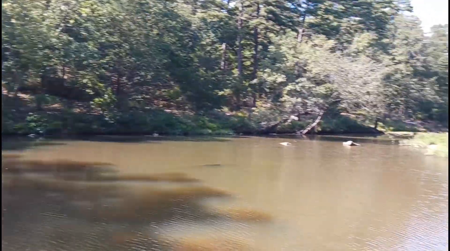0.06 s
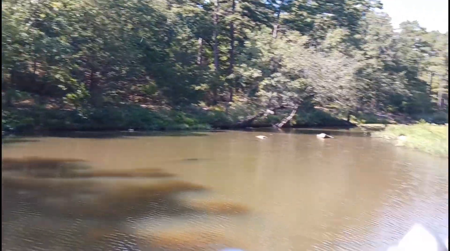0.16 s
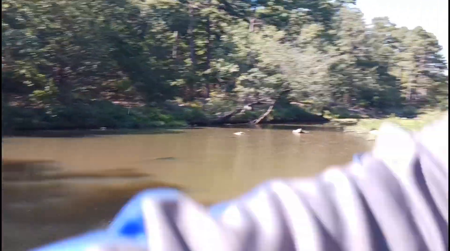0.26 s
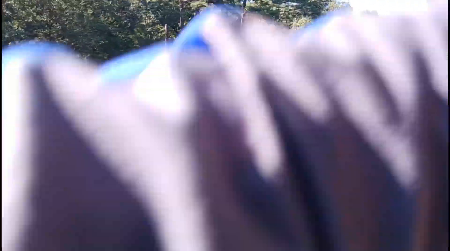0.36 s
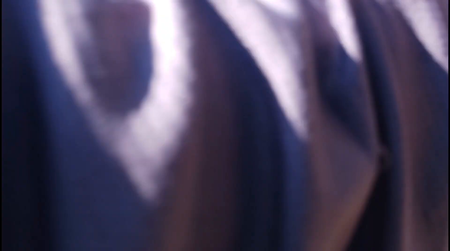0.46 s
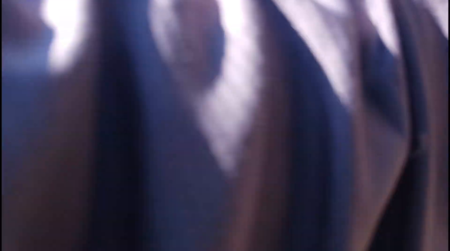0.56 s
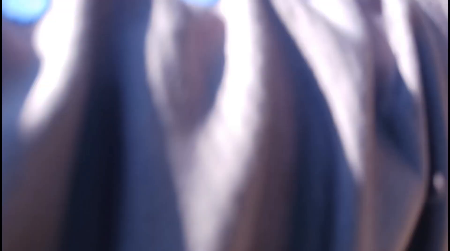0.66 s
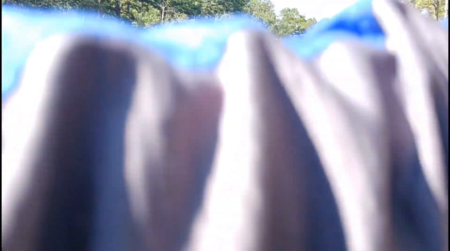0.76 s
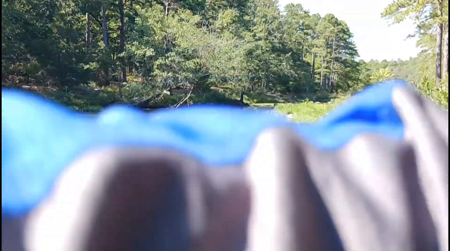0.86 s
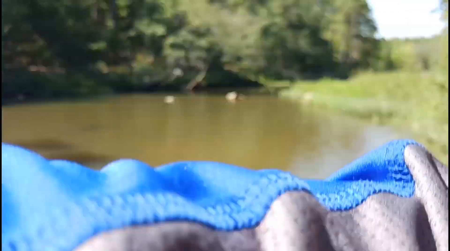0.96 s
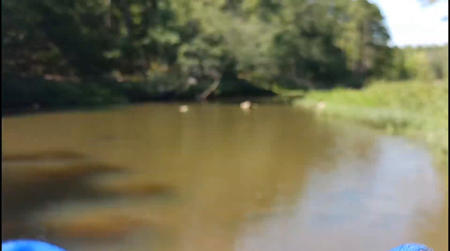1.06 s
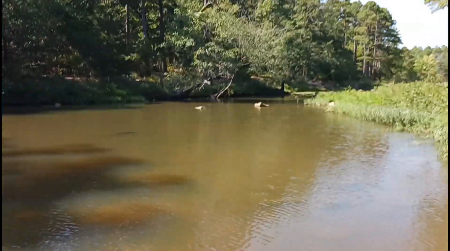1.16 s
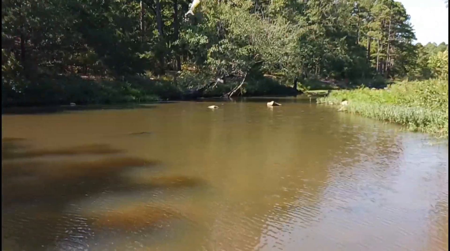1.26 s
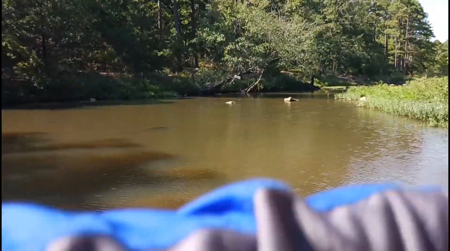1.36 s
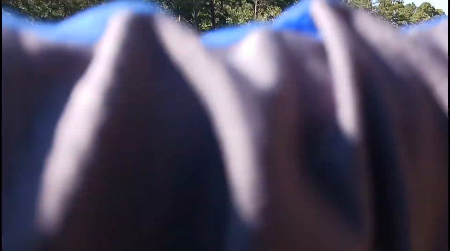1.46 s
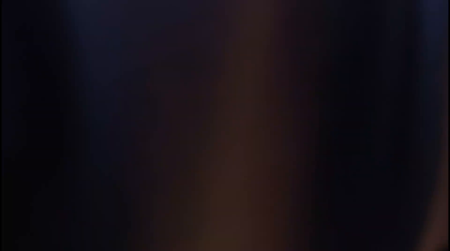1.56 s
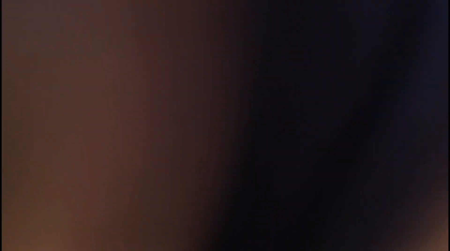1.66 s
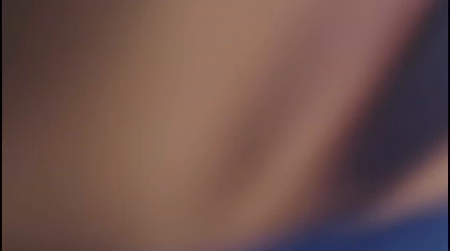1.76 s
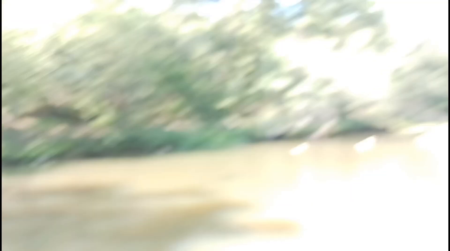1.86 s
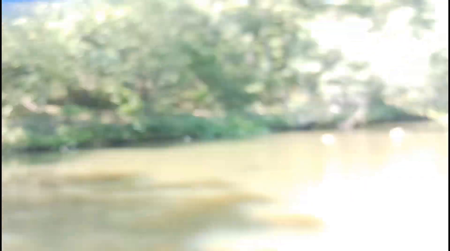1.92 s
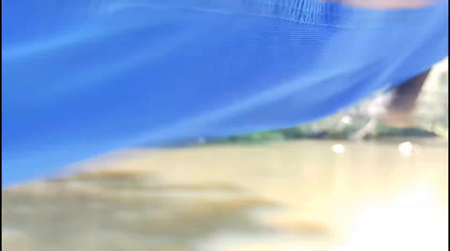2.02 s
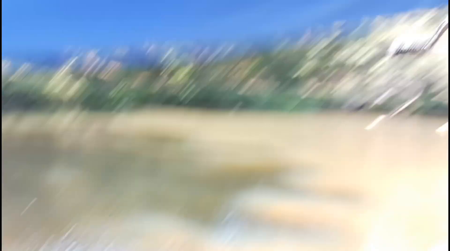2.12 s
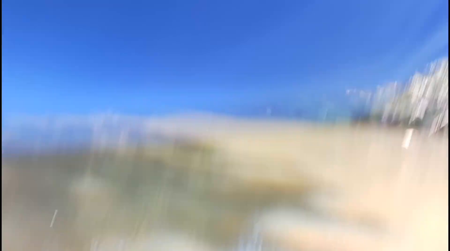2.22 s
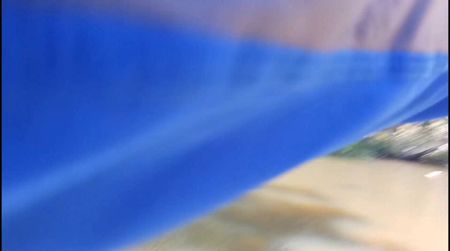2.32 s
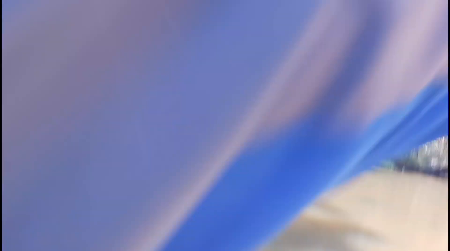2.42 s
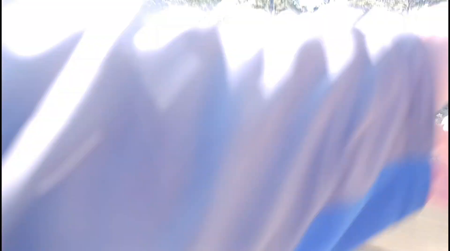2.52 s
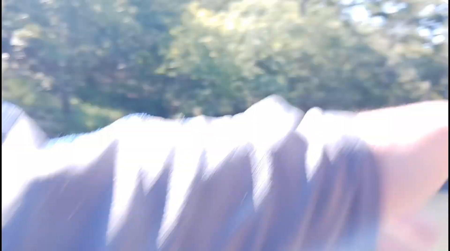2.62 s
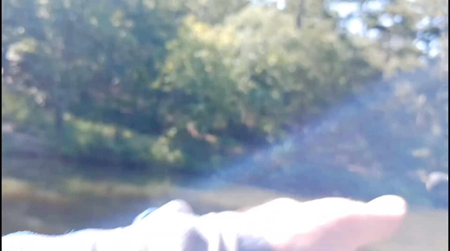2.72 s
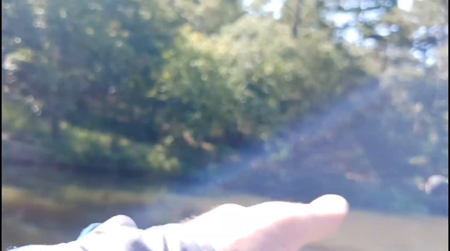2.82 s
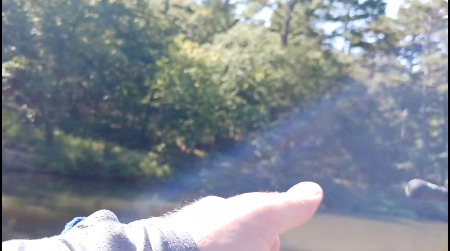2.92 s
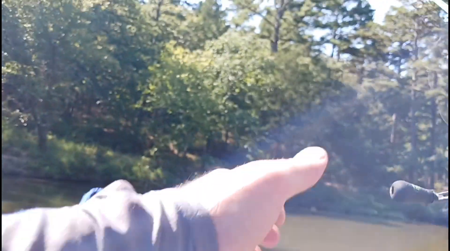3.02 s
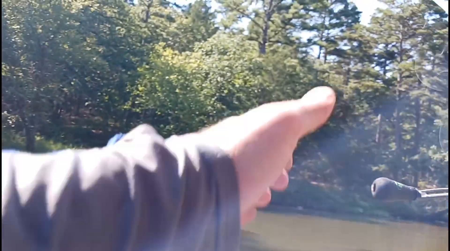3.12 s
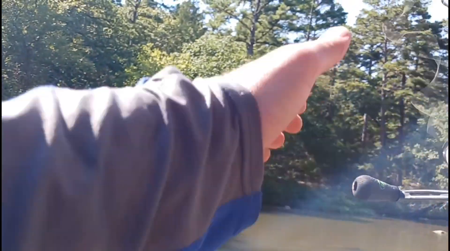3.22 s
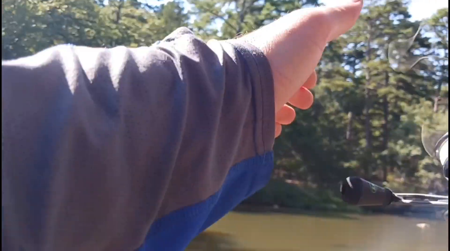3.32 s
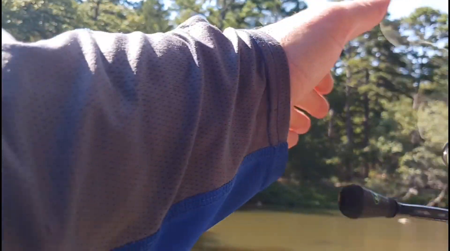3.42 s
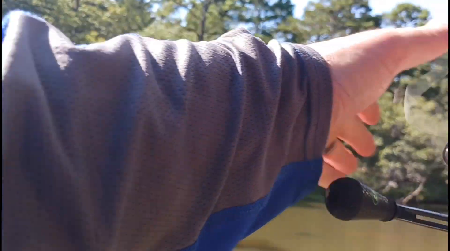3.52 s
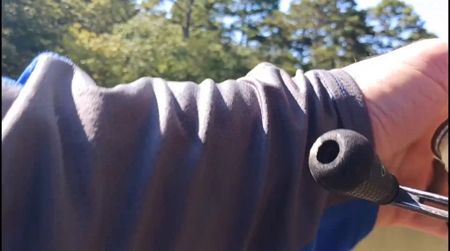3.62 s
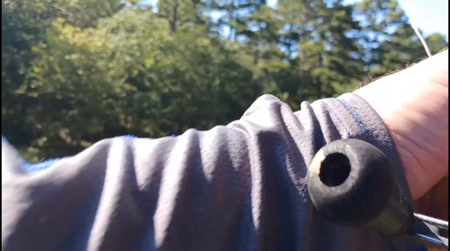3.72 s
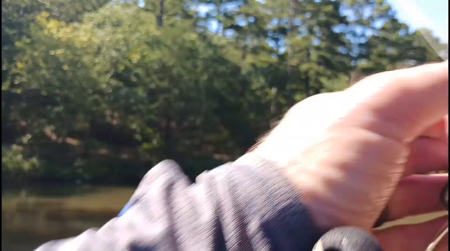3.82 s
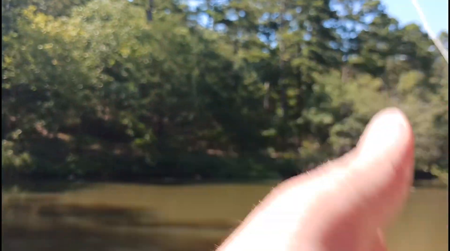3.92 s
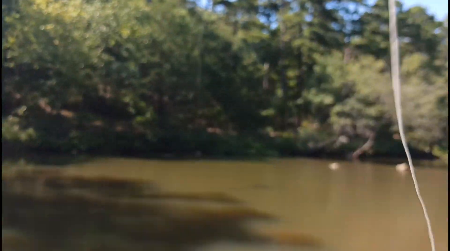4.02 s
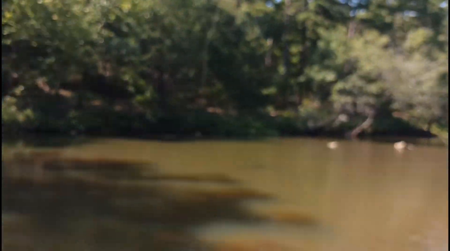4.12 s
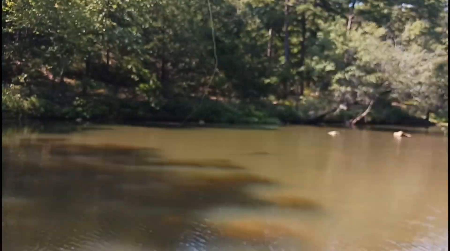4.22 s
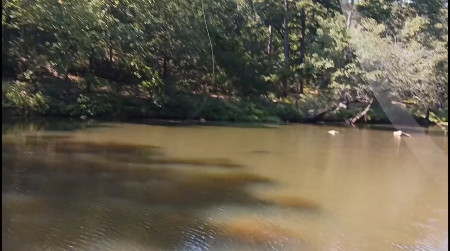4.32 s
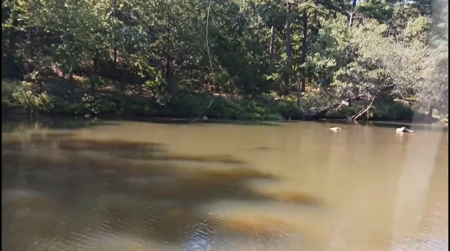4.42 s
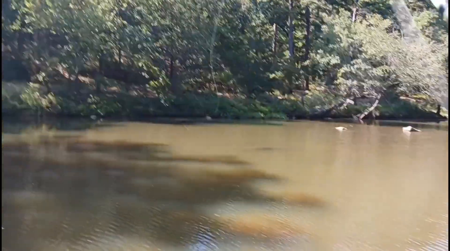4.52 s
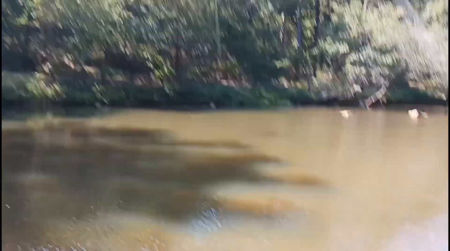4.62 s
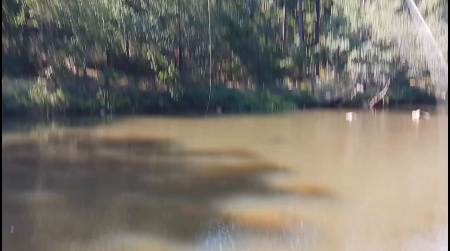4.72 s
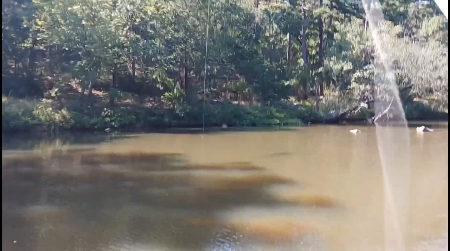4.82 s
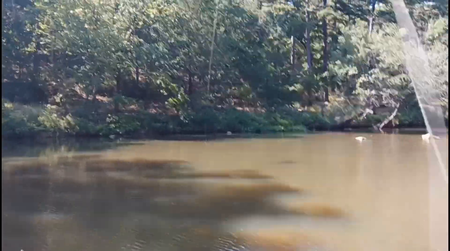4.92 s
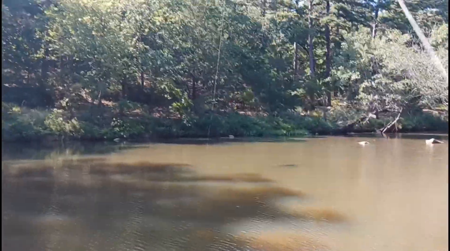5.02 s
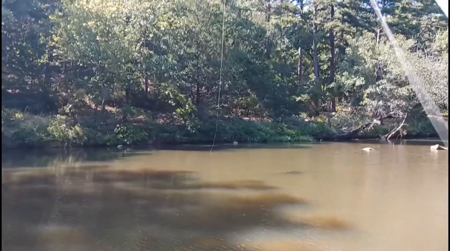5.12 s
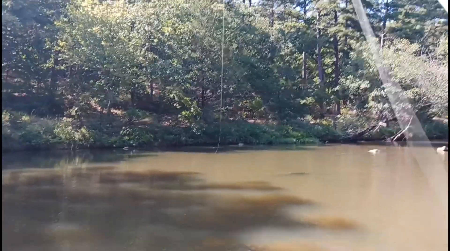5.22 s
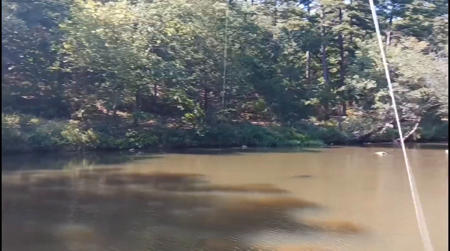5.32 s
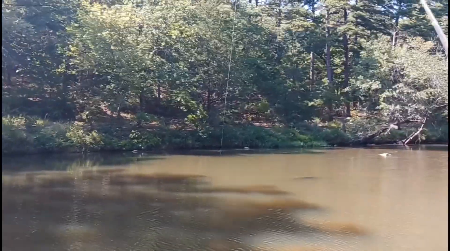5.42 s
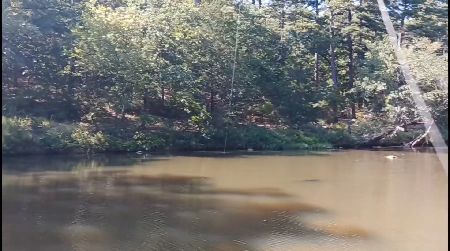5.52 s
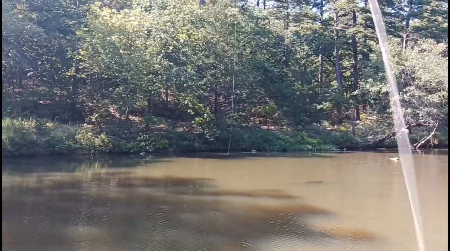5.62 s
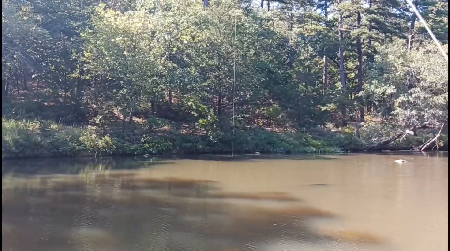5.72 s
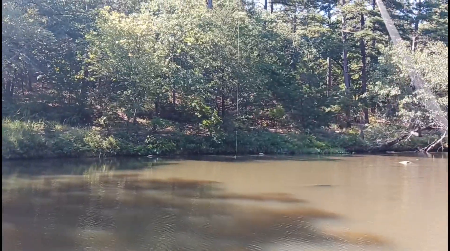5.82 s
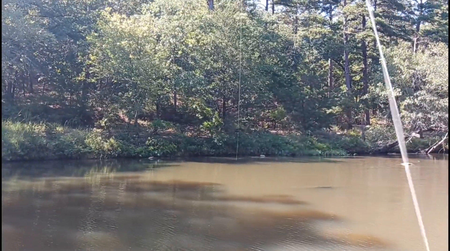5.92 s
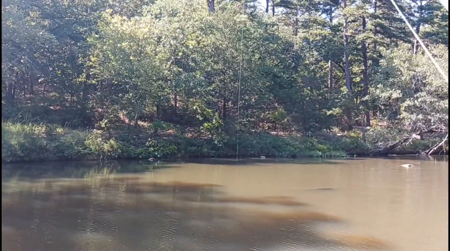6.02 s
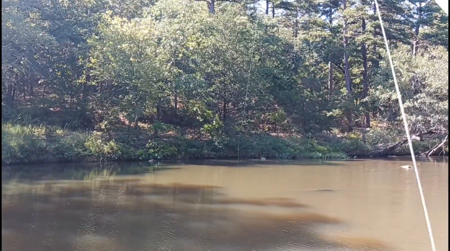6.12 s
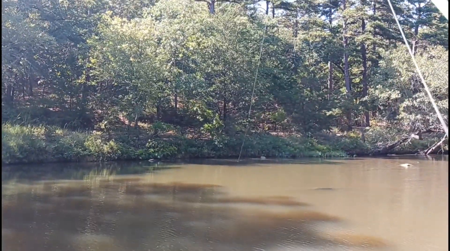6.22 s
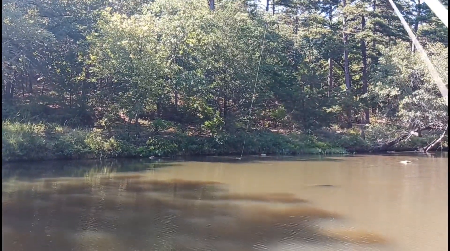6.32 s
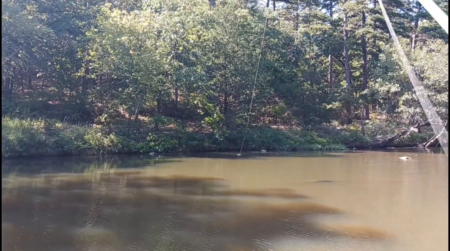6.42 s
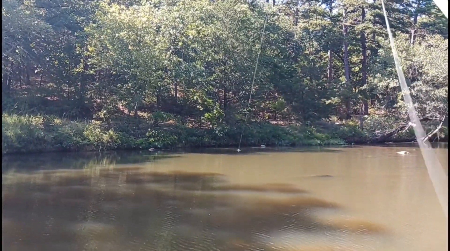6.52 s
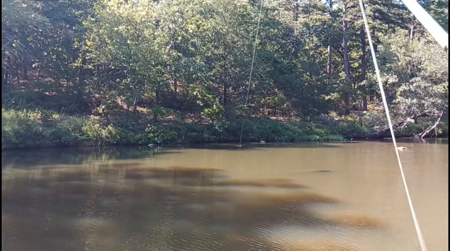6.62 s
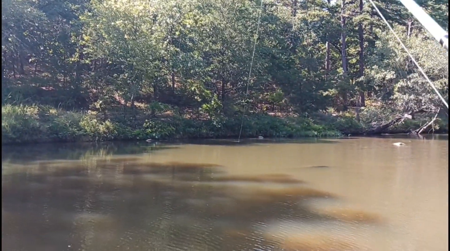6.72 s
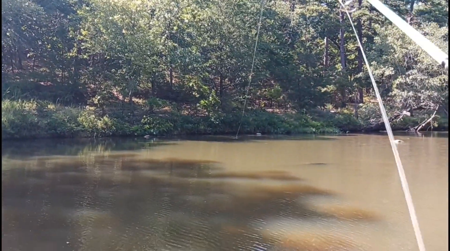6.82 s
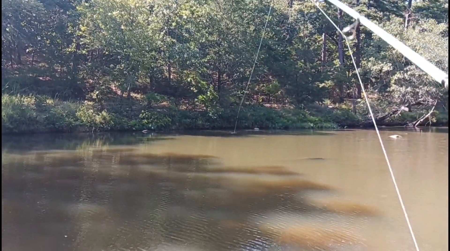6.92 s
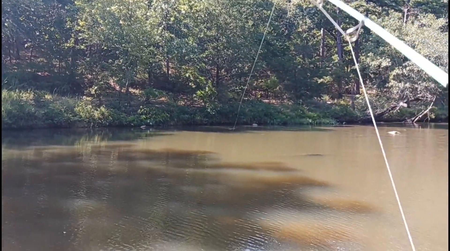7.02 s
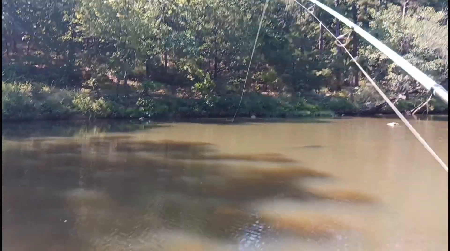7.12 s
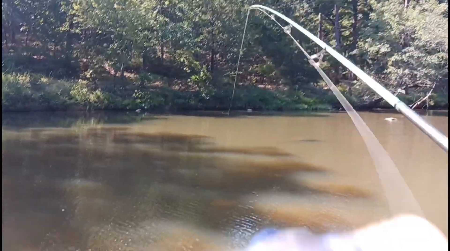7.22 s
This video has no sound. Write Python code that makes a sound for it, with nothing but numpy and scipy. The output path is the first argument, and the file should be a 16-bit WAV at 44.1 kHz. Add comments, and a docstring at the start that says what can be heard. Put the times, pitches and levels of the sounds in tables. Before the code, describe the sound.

Close beside a quiet creek, a fishing reel's bail clacks, cloth thumps the microphone, line hisses out, then the crank whirrs and ticks.

```python
"""A sleeve rustles over the hush of a creek and a spinning reel's bail clacks open, heard at the angler's chest.
Cloth drags over the left microphone port, then loose coils slap the rod and line hisses out with the lure's speed.
The bail snaps shut and the crank winds in, whirring and ticking; light air puffs mostly on the left port.
Friction is grainy filtered noise, contacts are short noise bursts, and hollow parts ring as damped sines.
Gear teeth are harmonics of an uneven tooth rate, passed through the resonances of the reel body."""
import sys
import numpy as np
from scipy import signal
from scipy.fft import rfft, irfft, next_fast_len
from scipy.io import wavfile
from scipy.ndimage import uniform_filter1d, map_coordinates

SR = 44100
rng = np.random.default_rng(int(sys.argv[2]) if len(sys.argv) > 2 else 0)


def output_pcm(signal):
    """Save a mono or channel-first signal as 16-bit PCM at the path in sys.argv[1].

    Samples are clipped to [-1, 1] before scaling.
    """
    pcm = np.clip(np.atleast_2d(signal).T, -1, 1) * 32767
    wavfile.write(sys.argv[1], SR, np.round(pcm).astype(np.int16))


N = 320323
TIME = np.arange(N) / SR

# Levels are relative, since later gains trim the layers; rise and fall are times for 20 dB.
# Faint hush of the creek bank. Each row: frequency in Hz, gain in dB.
CREEK_SPECTRUM = [(15, -32.5), (25, -3), (79, 0.5), (183, -13.5), (666, -15), (871, -24), (1620, -24.5),
                  (3260, -42), (4380, -23.5), (8130, -19.5), (9300, -22.5), (12500, -25.5), (15500, -18)]
# Low pressure noise of moving air on a port. Each row: frequency in Hz, gain in dB.
PUFF_SPECTRUM = [(22, -28.5), (42, -3.5), (58, 5), (85, -3.5), (130, -17), (250, -31.5), (700, -51.5),
                 (2000, -73.5)]
# Puffs of air. Each row: start of the hold in seconds, level in dB.
AIR_PUFFS = [(2.25, -42), (2.36, -43), (2.5, -40.5), (3.1, -42.5), (3.159, -45.5), (3.305, -49.5),
             (3.566, -47.5), (3.655, -41), (3.715, -42), (4.15, -40.5), (4.475, -47), (4.6, -52.5),
             (4.81, -48.5)]
# Envelope shared by the puffs. One row: rise, hold and fall in seconds.
PUFF_ENVELOPE = (0.045, 0.01, 0.059)
DRAUGHT_FROM_S, DRAUGHT_FOR_S, DRAUGHT_DB = 2.2, 2.615, -63.5  # weaker air between the puffs

# Arm movements that rustle the sleeve.
# Each row: start of the hold, rise, hold and fall in seconds, rub level in dB, fizz level in dB.
SLEEVE_MOVES = [(.03, 0.063, 0.47, .3, -68.5, -71.5), (.848, 0.072, 0.026, .06, -55.5, -60),
                (1.04, 0.25, 0.092, 0.36, -68, -66), (1.92, .15, 0.23, .1, -64.5, -66),
                (4.1, 0.32, 0.12, .1, -63.5, -67), (4.29, .1, 0.059, 0.13, -55.5, -58.5),
                (4.58, 0.066, 0.011, 0.12, -64.5, -52.5)]
# Folds of cloth dragged over the port.
# Each row: start of the hold, rise, hold and fall in seconds, buffeting level in dB, scraping level in dB.
CLOTH_DRAGS = [(1.707, .015, 0.07, 0.025, -28, -35.5), (1.825, 0.046, 0.036, .02, -36, -52.5),
               (1.866, 0.031, 0.004, 0.033, -32, -32.5)]
# Cloth rubbing on cloth. Each row: frequency in Hz, gain in dB.
RUB_SPECTRUM = [(200, -4.5), (900, -6), (1700, -1.5), (2700, -2), (3700, 4), (6500, 0.5), (9000, -0.5),
                (14000, -23)]
# High fizz of cloth fibres. Each row: frequency in Hz, gain in dB.
FIZZ_SPECTRUM = [(4000, -11.5), (7500, -7), (10300, -9.5), (11800, 1.5), (13000, 1), (15500, -4)]
# Pressure swings of cloth on the port. Each row: frequency in Hz, gain in dB.
BUFFET_SPECTRUM = [(28, -34), (52, -3.5), (90, 0), (190, -3.5), (290, -3), (480, -6.5), (750, -17),
                   (1500, -30.5), (3000, -61)]
# Cloth scraping the port. Each row: frequency in Hz, gain in dB.
SCRAPE_SPECTRUM = [(150, -9.5), (450, 8.5), (750, 11), (1300, 9.5), (2200, 3), (4000, 0), (8000, -5),
                   (15500, -1.5)]
CLOTH_DB, CLOTH_UNTIL_S = -71, 4.6  # faint fizz of cloth between the movements

# Soft bumps of hand, reel and sleeve.
# Each row: start in seconds, level in dB, swing in Hz, 60 dB decay in seconds, shudder in dB, left-right in dB.
SOFT_BUMPS = [(1.121, -15, 450, 0.0054, -29, -16), (1.783, -22.5, 69, 0.12, -21, 38),
              (2.164, -18, 67, .1, -14, 39), (2.345, -44.5, 290, 0.034, -2, 20),
              (2.461, -27.5, 72.6, 0.076, -27, 31), (4.578, -35.5, 219, .022, -15, -0.5),
              (5.095, -39, 178, 0.017, -12.5, 1), (6.519, -61.5, 334, .03, 3.5, -1),
              (6.64, -56, 372, .025, -5, 0)]
# Knocks on the reel's hollow cover. Each row: start in seconds, ring level in dB, contact tick level in dB.
COVER_KNOCKS = [(.37, -33.5, -39), (0.4465, -38.5, -52), (0.4518, -41, -58)]
# Modes of the hollow cover. Each row: frequency in Hz, level in dB, 60 dB decay in seconds.
COVER_MODES = [(2950, -5.5, 0.013), (3420, 2, 0.012), (4000, -12, .012)]

# Sharp contacts of bail and rotor.
# Each row: contact in seconds, level in dB, low band in dB, top band in dB, left-right in dB, ring in Hz.
BAIL_CLICKS = [(0.1309, -25.5, -12, 2.5, -9, 6800), (.138, -25, -17.5, 3, -4, 7300),
               (.147, -33, -9.5, 8, -2, 7100), (.165, -42.5, -5, 2, -2, 7400),
               (0.2397, -40, -18, -3.5, -4, 7200), (.257, -45, -8, -6, -7, 5500),
               (0.3316, -41, -9, 4, -8, 5000), (1.119, -32, -4, -7, -17, 4700),
               (1.1363, -38, -1, 1, -7, 2850), (1.1455, -28.5, -21, -8, -23, 4200),
               (1.1612, -38, -20, 6, -8, 7300), (1.7642, -29, 3, -7, 26, 7840),
               (3.465, -39.5, -19, 1, -3, 6340), (3.57, -45, -29, 5, 5, 6200),
               (3.8979, -29, -14.5, 8, 0, 3500), (3.9168, -29.5, -17, 6, -2, 5000),
               (3.9301, -22.5, -15.5, -0.5, -10, 8700), (4.0607, -46, -20, -7, 4, 4900),
               (4.076, -41, -10, -6, -6, 4470), (4.0886, -38, -11.5, 4.5, 4, 6560),
               (4.2454, -49.5, -19, 6, 4, 4000)]
# Spring and bail scraping over their stops.
# Each row: start and length in seconds, level in dB, low band in dB, top band in dB, left-right in dB.
BAIL_RASPS = [(0.106, 0.025, -41.5, -11.5, 2.5, -2), (0.128, 0.015, -31.5, -10, -1.5, -1),
              (1.117, 0.053, -51.5, -5, -8, -2), (3.904, 0.04, -34, -19, -2, -0.5),
              (3.922, .017, -29.5, -6.5, 4.5, 5), (3.935, 0.039, -43.5, -7.5, 0.5, 0)]
# Colour of hard small-part contacts. Each row: frequency in Hz, gain in dB.
CONTACT_SPECTRUM = [(100, -14), (900, -14.5), (1500, -10), (2200, -1.5), (3300, -2), (5300, 1), (6300, -3),
                    (7400, 0), (9500, -3.5), (12500, 0), (15500, -5.5)]
LOW_HZ, HIGH_HZ = 2800, 9000  # limits of the low, middle and top bands of a contact

# Flurries of coils slapping rod and guides. Each row: start and length in seconds, level in dB, low band in dB.
COIL_SLAPS = [(2.12, .009, -38.5, -3), (2.141, .021, -31.5, -1.5), (2.245, .014, -43, -26),
              (2.349, .009, -37, -25), (2.404, .009, -33.5, -16.5), (2.4289, .02, -25, -14)]
# Modes of the rod's twang under the last slaps. Each row: frequency in Hz, level in dB, 60 dB decay in seconds.
ROD_TWANG = [(1910, -12, .045), (2290, 1, .035), (2440, -9, .035), (3640, -15, .035), (4480, -12, .03)]
# Colour of coils on the rod. Each row: frequency in Hz, gain in dB.
ROD_SPECTRUM = [(100, -17.5), (1200, -8.5), (1700, 7.5), (2350, 7.5), (3000, -2.5), (3600, 3.5), (4500, 13),
                (5650, 4.5), (6400, -1.5), (10000, -13), (15500, -13)]
COIL_GAP_S, COIL_LEAN_DB = .0056, 3  # mean time between coils; their scatter from side to side

# Ticks of the rotor and incoming line. Each row: start in seconds, level in dB, low band in dB, top band in dB.
CLEAR_TICKS = [(5.4232, -49, -1, 4), (5.7978, -49, -25, -4.5), (6.138, -43, -24, -5),
               (6.2192, -48, -15.5, -1), (6.4816, -47, -3, 0), (6.4907, -41, -10, 1.5),
               (6.601, -41.5, -18.5, -9), (6.6566, -44, -8, -3), (6.6896, -45.5, -2, -6),
               (6.7053, -46, -1, -1), (6.8036, -45.5, -2, -7), (6.9623, -49, -13.5, -4),
               (6.9848, -37.5, -18.5, -0.5)]
TICK_RING_HZ = 4100
FAINT_FROM_S, FAINT_TO_S, FAINT_DB = 3.7, 6.8, -60.5  # fainter ticks fall at random

# Slack coils rushing off the spool.
# Each row: start of the hold, rise, hold and fall in seconds, hiss level in dB, flutter level in dB.
LINE_SURGES = [(2.125, 0.081, 0.31, 0.38, -50, -46), (3.463, .01, .02, 0.5, -55.5, -57.5)]
# Hiss of outgoing line. Each row: frequency in Hz, gain in dB.
HISS_SPECTRUM = [(500, -15.5), (2900, -34.5), (3500, -9), (6000, -3.5), (8600, 0), (9200, -2.5),
                 (11500, 1.5), (12400, 6), (13100, 3), (15500, 1.5)]
# Flutter of coils in the guides. Each row: frequency in Hz, gain in dB.
FLUTTER_SPECTRUM = [(200, -1), (600, -8), (1300, -9), (1700, -4), (2350, -0.5), (2650, -4.5), (3050, -12.5),
                    (3400, 4), (4600, 0), (5200, -2), (5700, -0.5), (6100, -7.5), (9000, -16.5),
                    (15000, -30)]
# the lure loses speed late in its flight: speed = 1 - (share of the flight) ** BRAKING
RELEASE_S, REST_S, BRAKING = 2.12, 3.9, 4.4
HISS_DB, HISS_GROWS, FLUTTER_DB = -53.5, 1.3, -70.5  # hiss at full speed, its power of speed; coils in the guides
SING_HZ, SING_DB, SING_S = 8850, -58.5, 3.08  # line singing across the rod guides: pitch at full speed, level, start of its hold

# The hand starts the crank jerkily, then keeps it nearly even. Each row: time in seconds, mean tooth rate in Hz.
TOOTH_RATE = [(4.785, 640), (4.825, 530), (4.865, 600), (4.9, 535), (4.945, 665), (5.05, 540), (5.3, 565)]
# Resonances of the reel body. Each row: centre in Hz, width in Hz, level in dB.
BODY_MODES = [(810, 200, -15), (965, 150, -20.5), (1615, 69, -4), (1900, 170, -8.5), (2390, 46, 0.5),
              (2620, 67, -6), (3408, 95, 0), (4400, 2660, -10.5)]
# Harder pulls on the crank.
# Each row: start of the hold, rise, hold and fall in seconds, gear level in dB, line hiss level in dB.
CRANK_PULLS = [(4.83, 0.27, 0.079, .16, -60.5, -59.5), (6.61, 0.24, 0.1, .24, -61.5, -64),
               (7.243, 0.047, .02, .1, -59.5, -74.5)]
# Hiss of wet line winding in. Each row: frequency in Hz, gain in dB.
WINDING_SPECTRUM = [(250, -1), (1000, 0.5), (3000, -1), (5500, -5.5), (8000, 2), (10000, -2), (12000, 2),
                    (15500, 0.5)]
WIND_FROM_S, WIND_TO_S = 4.7, 6.98  # steady winding
GEAR_DB, WET_LINE_DB, EASE_DB_PER_S = -64, -65, 6  # levels at its start, and how they ease off

TOP_HZ = 15650  # upper band limit


def amp(db):
    """A level in decibels corresponds to a gain of 10 ** (dB / 20)."""
    return 10 ** (np.asarray(db) / 20)


def unit(x):
    """Normalisation scales each channel to rms 1."""
    return x / np.sqrt(np.mean(x ** 2, axis=-1, keepdims=True) + 1e-30)


def shape(points):
    """A spectrum is interpolated in dB over log frequency, from (Hz, dB) points."""
    f, db = np.transpose(points)
    return lambda hz: amp(np.interp(np.log(hz + 1), np.log(f), db))


def wobble(rate):
    """A slow fluctuation is a smooth curve through random knots, rate of them a second."""
    return map_coordinates(rng.standard_normal(int(N * rate / SR) + 4), [TIME * rate])


def filtered(x, response):
    """Linear filtering multiplies the spectrum by a response of frequency."""
    n = x.shape[-1]
    m = next_fast_len(n + 4096)
    return irfft(rfft(x, m) * response(np.fft.rfftfreq(m, 1 / SR)), m)[..., :n]


def pan(lean_db):
    """A level difference between the ports gives direction; the gains have mean power 1."""
    return unit(amp(np.array([lean_db, -lean_db]) / 2))[:, None]


def swell(s, rise_s, hold_s, fall_s):
    """Exponential growth reaches 1 at time s, holds and decays; rise and fall are the times for 20 dB."""
    before = np.maximum(s - TIME, 0)
    after = np.maximum(TIME - s - hold_s, 0)
    return 10 ** -(before / rise_s + after / fall_s)


def strokes(rows):
    """Independent strokes add in power: one gain curve for each dB column after start, rise, hold and fall."""
    return np.sqrt(sum((amp(row[4:])[:, None] * swell(*row[:4])) ** 2 for row in rows))


def add(track, s, sound):
    """Superposition mixes a sound in at time s."""
    part = track[:, max(round(s * SR), 0):][:, :sound.shape[1]]
    part += sound[:, :part.shape[1]]


def resonance(hz, centre_hz, width_hz):
    """A damped mode responds as a second-order band-pass, 1 at its centre."""
    return 1j * hz * width_hz / (centre_hz ** 2 - hz ** 2 + 1j * hz * width_hz)


def ringing(modes, t):
    """Free vibration is a sum of decaying sines, met at a different phase by each port."""
    return sum(amp(db - 60 * t / t60) * np.sin(2 * np.pi * (hz * t + rng.random((2, 1)))) for hz, db, t60 in modes)


def friction(response, grain_db, grain_rate=900):
    """Friction is noise whose strength jumps from fibre to fibre; each port hears its own detail."""
    grain = amp(grain_db * wobble(grain_rate))
    return unit(filtered(rng.standard_normal((2, N)) * grain, response))


def strike(envelope, body, low_db, top_db, length, ring_hz=4500, ring_db=0, ripple_db=3):
    """Impact excites dense, short-lived modes; low and top bands are weighed against the middle one."""
    hz = np.fft.rfftfreq(len(envelope), 1 / SR)
    # every point of contact favours different modes
    ripple = map_coordinates(rng.standard_normal(64), [hz / 550], mode="nearest")
    ring = ring_db * abs(resonance(hz, ring_hz, width_hz=800))
    colour = shape(body)(hz) * amp(ripple_db * ripple + ring)
    band = np.digitize(hz, [LOW_HZ, HIGH_HZ])
    weight = amp([low_db, 0, top_db]) / np.sqrt(np.bincount(band, colour ** 2))
    # smoothing joins the band edges
    colour = colour * np.exp(uniform_filter1d(np.log(weight[band]), size=100))
    # minimum phase: the filter does not ring ahead of its input
    cepstrum = irfft(np.log(colour))
    fold = 1 + np.sign(len(hz) - 1 - np.arange(len(cepstrum)))
    causal = np.exp(rfft(cepstrum * fold))
    noise = envelope * rng.standard_normal((2, len(envelope)))
    burst = irfft(rfft(noise) * causal)
    # the level is that of a burst of the given length in seconds
    return unit(burst) * np.sqrt(length * SR / len(envelope))


def blow(t, t60, tail_db, tail_t60):
    """An impulse of contact rises fast, falls fast and leaves a weak after-ring."""
    rise = 1 - np.exp(-t / .0003)
    return rise * (amp(-60 * t / t60) + amp(tail_db - 60 * t / tail_t60))


def tick(low_db, top_db):
    """A light contact of small parts is a brief burst with a mild resonance."""
    contact = blow(TIME[:4096], t60=.008, tail_db=-27, tail_t60=.06)
    return strike(contact, CONTACT_SPECTRUM, low_db, top_db, length=.004, ring_hz=TICK_RING_HZ, ring_db=4)


def air():
    """Turbulent air presses low noise mostly on the left port, over the faint hush of the creek bank."""
    push = strokes([(s, *PUFF_ENVELOPE, db) for s, db in AIR_PUFFS])[0]
    draught = amp(DRAUGHT_DB + 4 * wobble(5.9)) * swell(DRAUGHT_FROM_S, .1, DRAUGHT_FOR_S, 0.17)
    puffs = (push + draught) * pan(26) * friction(shape(PUFF_SPECTRUM), grain_db=5)
    creek = amp(-68.0) * friction(shape(CREEK_SPECTRUM), grain_db=2.5)
    return puffs + creek


def sleeve(port_top=0.48):
    """Cloth friction rustles as the arms move, and loads the left port in the back swing."""
    rub, fizz = strokes(SLEEVE_MOVES)
    fizz = np.hypot(fizz, amp(CLOTH_DB) * swell(0, .1, CLOTH_UNTIL_S, .2))
    rubbing = amp(-1.0) * rub * friction(shape(RUB_SPECTRUM), grain_db=2.5)
    fizzing = amp(1.0) * fizz * amp(1.9 * wobble(22)) * friction(shape(FIZZ_SPECTRUM), grain_db=3.5)
    buffet, scrape = strokes(CLOTH_DRAGS)
    buffeting = buffet * friction(shape(BUFFET_SPECTRUM), grain_db=4.5)
    scraping = scrape * friction(shape(SCRAPE_SPECTRUM), grain_db=1.0)
    port = amp(5.5) * pan(34) * (buffeting + scraping)
    # the narrow port rounds off the strongest pressure swings
    return rubbing + fizzing + port_top * np.tanh(port / port_top)


def bumps():
    """A soft impact is a damped low oscillation with a dull shudder of low-passed noise."""
    out, t = np.zeros((2, N)), TIME[:8192]
    for s, db, hz, t60, shudder_db, lean_db in SOFT_BUMPS:
        swing = np.sin(2 * np.pi * hz * t) * amp(-60 * t / t60)
        shudder = unit(filtered(rng.standard_normal((2, len(t))), lambda f: 1 / (1 + (f / (2 * hz)) ** 3)))
        shudder *= amp(shudder_db - 60 * t / 0.18) * (1 - np.exp(-t / .003))
        add(out, s, amp(db) * pan(lean_db) * (swing + shudder))
    return out


def knocks():
    """A hollow cover answers a contact with a short free vibration of its modes."""
    out, t = np.zeros((2, N)), TIME[:4096]
    onset = 1 - np.exp(-t / 0.00027)
    for s, db, tick_db in COVER_KNOCKS:
        add(out, s, amp(tick_db) * tick(low_db=-14, top_db=-16))
        add(out, s, amp(db) * pan(-4.5) * ringing(COVER_MODES, t) * onset)
    return out


def bail():
    """Metal impacts click, and stick-slip scrapes unevenly as the bail swings over."""
    out, t = np.zeros((2, N)), TIME[:4096]
    lead_in_s = .003  # a faint noise ramp leads into each click
    lead_in = amp(-24) * np.minimum(t / lead_in_s, 1) * (t < lead_in_s)
    contact = lead_in + blow(np.maximum(t - lead_in_s, 0), t60=.008, tail_db=-27, tail_t60=.06)
    for s, db, low_db, top_db, lean_db, ring_hz in BAIL_CLICKS:
        click = strike(contact, CONTACT_SPECTRUM, low_db, top_db, length=.004, ring_hz=ring_hz, ring_db=9)
        add(out, s - lead_in_s, amp(db) * pan(lean_db) * click)
    for s, length, db, low_db, top_db, lean_db in BAIL_RASPS:
        slips = amp(1.9 * map_coordinates(rng.standard_normal(200), [t * 1100]))
        stroke = np.minimum(t / (.3 * length), 1) * amp(-60 * np.maximum(t - length, 0) / .028)
        rasp = strike(slips * stroke, CONTACT_SPECTRUM, low_db, top_db, length, ripple_db=2.5)
        add(out, s, amp(db - 1.5) * pan(lean_db) * rasp)
    return out


def slaps(twang_s=2.4455, twang_db=-14, top_db=-14):
    """Repeated impacts of coils excite the rod, whose modes then twang briefly."""
    out, t = np.zeros((2, N)), TIME[:4096]
    whip = blow(t, t60=.016, tail_db=-20, tail_t60=.05)
    for s, length, db, low_db in COIL_SLAPS:
        for k, (late, lean) in enumerate(rng.uniform(-1, 1, size=(5, 2))):
            slap = strike(whip, ROD_SPECTRUM, low_db, top_db, length=.004, ripple_db=2)
            if k * COIL_GAP_S < length:
                add(out, s + (k + .2 * late) * COIL_GAP_S, amp(db) * pan(COIL_LEAN_DB * lean) * slap)
    onset = 1 - np.exp(-(t / .004) ** 2)
    add(out, twang_s, amp(twang_db) * pan(4.4) * ringing(ROD_TWANG, t) * onset)
    return out


def ticks(count=16):
    """Light contacts of the reel tick: clear ones at set times, faint ones at random."""
    out = np.zeros((2, N))
    faint = [(FAINT_FROM_S + u * (FAINT_TO_S - FAINT_FROM_S), FAINT_DB, -8, 2) for u in rng.random(count)]
    for s, db, low_db, top_db in [*CLEAR_TICKS, *faint]:
        add(out, s, amp(db) * tick(low_db, top_db))
    return out


def line_out():
    """Running line makes friction hiss, coil flutter and a faint tone; the lure's speed leads hiss and tone."""
    speed = 1 - np.clip((TIME - RELEASE_S) / (REST_S - RELEASE_S), 0, 1) ** BRAKING
    flying = swell(RELEASE_S, 0.027, REST_S - RELEASE_S, .05)
    surge_hiss, surge_flutter = strokes(LINE_SURGES)
    hiss = np.hypot(amp(HISS_DB) * flying * speed ** HISS_GROWS, surge_hiss)
    flutter = np.hypot(amp(FLUTTER_DB) * flying, surge_flutter)
    hissing = friction(shape(HISS_SPECTRUM), grain_db=1.7, grain_rate=700)
    rush = amp(5.5) * hiss * amp(1.1 * wobble(42)) * pan(1.6) * hissing
    rattling = friction(shape(FLUTTER_SPECTRUM), grain_db=3.7, grain_rate=800)
    rattle = flutter * amp(1.5 * wobble(60)) * rattling
    # low-passed noise on two quadrature carriers gives a blurred tone
    phase = 2 * np.pi * np.cumsum(SING_HZ * speed) / SR
    blur = lambda: friction(lambda f: 1 / (1 + (f / 400) ** 2), grain_db=2)
    tone = blur() * np.cos(phase) + blur() * np.sin(phase)
    singing = amp(SING_DB + 3 * wobble(25)) * swell(SING_S, .3, 0.14, 2.4) * np.clip(2 * speed - .5, 0, 1)
    return rush + rattle + pan(-2.5) * singing * tone


def reel_in(rotor_hz=8.3, spool_hz=2275, spool_db=-69):
    """Meshing teeth force the hollow body's resonances at the hand's uneven speed; wet line hisses in."""
    elapsed = np.maximum(TIME - WIND_FROM_S, 0)
    winding = swell(WIND_FROM_S, 0.21, WIND_TO_S - WIND_FROM_S, 0.15) * amp(-EASE_DB_PER_S * elapsed)
    gear, hiss = np.hypot(amp([[GEAR_DB], [WET_LINE_DB]]) * winding, strokes(CRANK_PULLS))
    unevenness = 1 + .025 * wobble(14) + .03 * wobble(450)
    mesh = np.cumsum(np.interp(TIME, *np.transpose(TOOTH_RATE)) * unevenness) / SR  # teeth passed
    teeth = sum(amp(4 * wobble(20)) * np.sin(2 * np.pi * (k * mesh + rng.random((2, 1)))) for k in range(1, 7))
    # neighbouring modes have opposite sign
    body = lambda f: sum((-1) ** k * amp(db) * resonance(f, hz, width)
                         for k, (hz, width, db) in enumerate(BODY_MODES))
    # the load wanders over the teeth, so each resonance swells by itself
    rubbing = 0
    for hz, width, db in BODY_MODES:
        mode_noise = friction(lambda f: resonance(f, hz, width), grain_db=3.0)
        rubbing = rubbing + amp(db) * np.sqrt(width) * amp(2.7 * wobble(19)) * mode_noise
    whirr = .65 * unit(filtered(teeth, body)) + unit(rubbing)
    # the third harmonic of the teeth whines through in broken chirps, most of all early on
    catch = amp(3.5 * wobble(22)) * swell(WIND_FROM_S + .1, .06, .25, 3)
    whine = np.sin(2 * np.pi * (3 * mesh + .08 * wobble(260) + rng.random((2, 1))))
    whirr = whirr + amp(-4) * catch * whine
    # the spool rings at one pitch for as long as it turns
    turning = swell(WIND_FROM_S + .1, .15, WIND_TO_S - WIND_FROM_S - .1, .1) * amp(2 * wobble(16) - 3 * elapsed)
    spool_ring = friction(lambda f: resonance(f, spool_hz, width_hz=90) ** 2, grain_db=1.5)
    spool = amp(spool_db) * turning * spool_ring
    # the rotor adds a slight uneven throb
    turns = rotor_hz * elapsed + .12 * wobble(3)
    throb = amp(2.4 * np.cos(2 * np.pi * turns) + 1.3 * wobble(30))
    wet_line = amp(3.5) * hiss * np.sqrt(throb) * friction(shape(WINDING_SPECTRUM), grain_db=2.5)
    return throb * (amp(3.0) * gear * whirr + spool) + wet_line


def scene():
    """Superposition of the direct sounds: all is within arm's reach in open air, without reverberation."""
    background = air() + sleeve()
    contacts = bumps() + knocks() + bail() + slaps() + ticks()
    return background + contacts + line_out() + reel_in()


def record(dry, low_cut_hz=36):
    """Band limiting: a high-pass thins the deepest bass and a steep low-pass ends the treble."""
    dry = signal.sosfilt(signal.butter(2, low_cut_hz, "highpass", fs=SR, output="sos"), dry)
    return filtered(dry, lambda hz: 1 / np.sqrt(1 + (hz / TOP_HZ) ** 200))


dry = scene()
out = record(dry)
output_pcm(out)
```